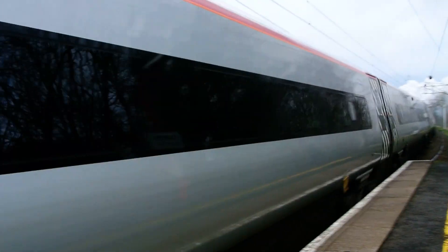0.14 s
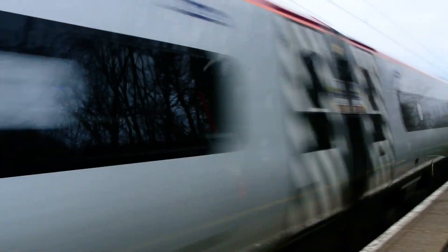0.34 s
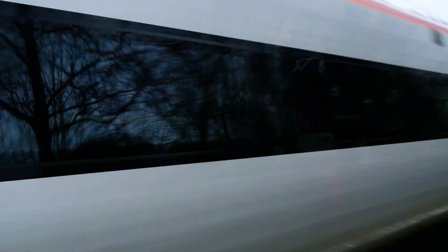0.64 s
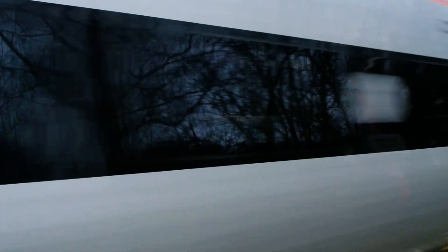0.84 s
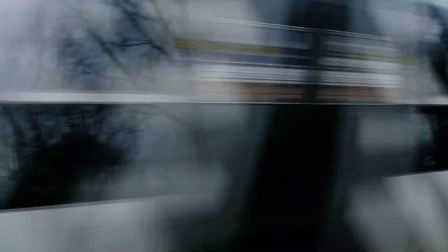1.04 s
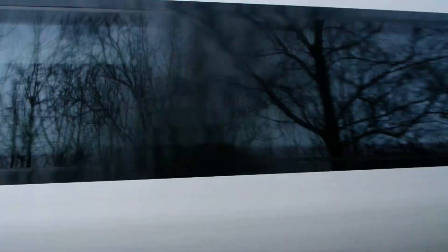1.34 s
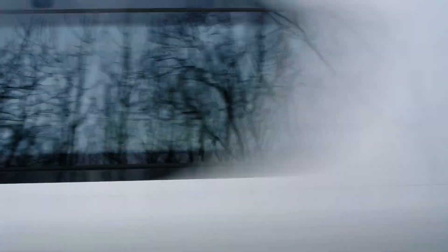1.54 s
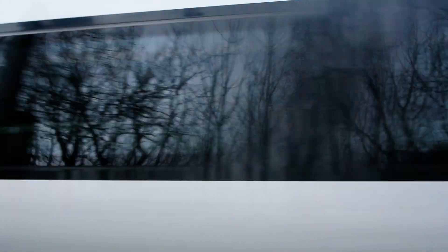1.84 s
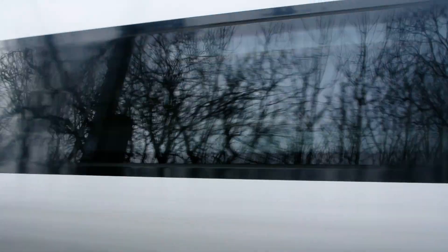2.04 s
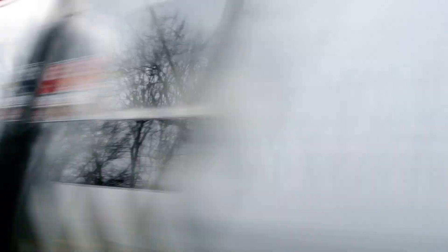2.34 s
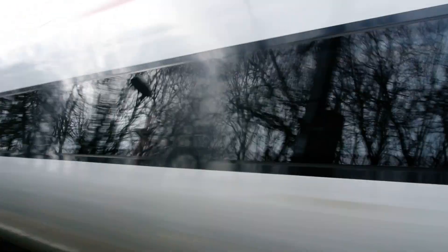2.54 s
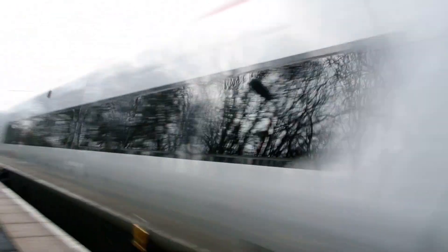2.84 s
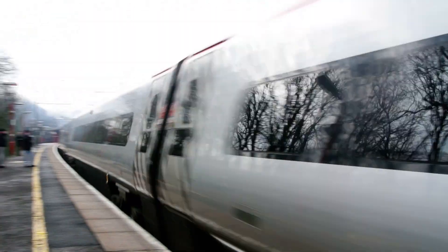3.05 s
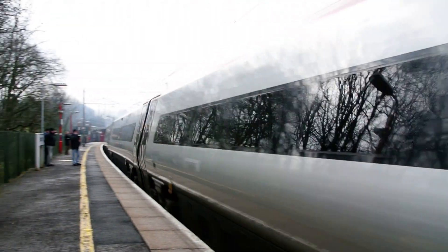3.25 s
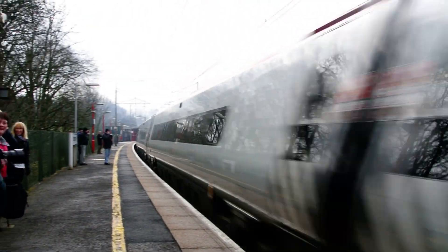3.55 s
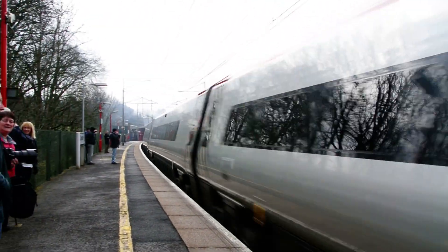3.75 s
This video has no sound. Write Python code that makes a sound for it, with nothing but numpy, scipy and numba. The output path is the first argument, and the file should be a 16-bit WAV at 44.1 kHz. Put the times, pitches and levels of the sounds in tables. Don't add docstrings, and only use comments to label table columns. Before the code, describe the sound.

A fast train rushes past a platform edge a few metres from a small stereo microphone, roaring loudest at first, pulsing with each set of wheels, with short falling squeals, then shrill brake hisses as it gradually eases.

```python
import sys
import numpy as np
from scipy import signal
from scipy.io import wavfile
from scipy.ndimage import uniform_filter1d
from numba import njit

SR = 44100
rng = np.random.default_rng(int(sys.argv[2]) if len(sys.argv) > 2 else 0)


def unload_wav(signal):
    wavfile.write(
        sys.argv[1],
        SR,
        np.round(np.clip(np.atleast_2d(signal).T, -1, 1) * 32767).astype(np.int16),
    )


def natural_amplitude(level_db):
    exponent = np.asarray(level_db, float) / 20
    return 10 ** exponent


N = 171990
T = np.arange(N) / SR

SPEED_M_S, EDGE_M = 40, 3
TURN_S, TURN_LENGTH_S = 1.385, 0.43
PORT_LAG = 6
RISE = 0.82

# time_s, rolling_level_db, bass_tilt_db_per_octave, air_rush_db,
# treble_pan_db (left minus right)
PASSING = [(0, -26, -1.5, -2.5, 5), (.36, -23, 2, -1, 1), (.65, -30, 0.5, 0, 4), (.93, -29, 1.5, 1.5, 0),
           (1.29, -35.5, 0.5, 0, 4), (1.51, -33.5, 0.5, 3.5, -1), (1.64, -29.5, 2, 3, 0),
           (2.0, -35.5, -1, 1.5, 1.5), (2.35, -33.5, 2, 5, -1), (2.61, -35, 2.5, 0.5, 2),
           (2.8, -34.5, 1.5, 2.5, -2), (2.95, -33, 2.5, -4.5, -2.5), (3.19, -37.5, 1, -1, 0.5),
           (3.42, -35, 1, -1, -5.5), (3.58, -34.5, 3.5, -6, -2.5), (3.7, -40.5, 2.5, 2, -1.5),
           (3.9, -41, 0, 0, -3)]


def train_passing():
    return curves(PASSING)


# time_s, boost_db, rise_s
BOGIES = [
    (.37, 1, 0.043),
    (.56, 1, 0.058),
    (.97, 4, 0.079),
    (1.14, 3.5, 0.026),
    (1.62, 3.5, 0.076),
    (2.3, 2.5, 0.2),
    (2.99, 2, 0.071),
    (3.601, 3, 0.099),
]


def bogie_thunder():
    drop_s = 0.021
    boost_db = 0
    for at_s, db, rise_s in BOGIES:
        side_s = np.where(T < at_s, rise_s, drop_s)
        boost_db = boost_db + db * np.exp(-.5 * ((T - at_s) / side_s) ** 2)
    return boost_db


# pitch_hz, density_db (per Hz)
ROLLING = [(15, -45), (30, -4), (269, -6), (1220, -5), (1510, -10), (1930, -1.5), (3590, -10), (4580, -6.5),
           (15900, -11)]
# pitch_hz, width_hz, level_db (relative to the rolling level)
WHEEL_MODES = [(254, 175, -11.5), (615, 155, -13), (1208, 75, -15), (1758, 116, -10.5), (1850, 140, -18.5),
               (2352, 120, -13), (4440, 1270, -3.5), (9270, 160, -18.5)]


def roar():
    roll_db, tilt, rush_db, pan_db = train_passing()
    bogie_db = bogie_thunder()
    behind_share, abeam_share = 0.19, 0.57
    turned = 1 / (1 + np.exp(np.clip(-(T - TURN_S) / (TURN_LENGTH_S / 4), -40, 40)))
    leaving = np.clip(behind_share + (1 - 2 * behind_share) * turned, 0, 1)

    thirds = []
    for hz in 25 * 2 ** (np.arange(29) / 3):
        thirds.append((hz, hz * .2316, shape(ROLLING, hz) + 10 * np.log10(hz)))
    middle_db = 10 * np.log10(sum(10 ** (db / 10) for hz, _, db in thirds if 750 < hz < 3000))
    parts = [(hz, width, db - middle_db, 1) for hz, width, db in thirds]
    parts += [(hz, width, db, 0) for hz, width, db in WHEEL_MODES]

    out, gust = 0, walk(13)
    for hz, width, db, broad in parts:
        treble = np.clip(np.log2(hz / 2500) / 2, 0, 1)
        gain_db = roll_db + db + tilt * min(np.log2(hz / 800), 0) + rush_db * treble - 1.0
        gain_db = gain_db + 0.96 * gust + (1.2 if broad else 2.5) * walk(8.95)
        gain_db = gain_db + bogie_db * broad * (1 - 0.54 * treble)
        gain_db = gain_db - 4.5 * broad * np.exp(-(np.log2(hz / 6650) * 4) ** 2)

        alike = likeness(hz)
        ahead, behind, abeam, own = ports(band(hz - width / 2, hz + width / 2, channels=5))
        common = np.sqrt(1 - leaving) * ahead + np.sqrt(leaving) * behind + abeam_share * abeam
        pair = np.sqrt(alike / (1 + abeam_share ** 2)) * common + np.sqrt(1 - alike) * own
        out = out + natural_amplitude(gain_db) * pair * panned(0.5 + pan_db * (0.31 + 2.1 * treble))
    return out


# loudest_s, length_s, pitch_hz, since_abeam_s, level_db
SQUEALS = [
    (0.073, .05, 8180, .04, -27.5),
    (0.395, 0.038, 9280, .2, -26.5),
    (0.396, .03, 5300, .2, -28),
    (0.449, .25, 4625, 0.35, -29),
    (0.538, .07, 4690, 0.09, -26),
    (0.661, .05, 8240, 0.066, -30),
    (0.949, .05, 4500, 0.085, -18.5),
    (1.007, .04, 4230, 0.12, -25.5),
    (1.67, 0.052, 5380, .07, -27.5),
    (1.793, .04, 4070, 0.16, -30),
]


def squeals():
    pan_db = train_passing()[3]
    out = 0
    for at_s, length_s, hz, since_s, db in SQUEALS:
        out = out + passing_squeal(at_s, length_s, hz / doppler(since_s), since_s, db, 0.93 * pan_db,
                                   width_hz=200, halo_db=-7, rise=RISE)
    return out


def chirp():
    at_s, hz, hz_per_s = 2.804, 10570, -65000
    pan_db = 1.9 * train_passing()[3]
    return burst(at_s, .018, lambda t: hz + hz_per_s * (t - at_s), 150, -28, pan_db, 0.54, RISE)


# loudest_s, length_s, since_abeam_s, attack_share (of the length), level_db
DISCS = [(1.12, .06, .03, 0.49, -33), (1.22, 0.084, 0.038, .7, -30), (1.31, 0.06, 0.19, .7, -37),
         (1.847, .07, .09, 0.49, -30), (2.317, .12, .13, .6, -40), (2.50, .15, .3, .6, -46),
         (2.994, 0.082, 0.066, .05, -16.5), (3.092, 0.073, 0.18, 0.67, -26), (3.28, .2, .4, .6, -35),
         (3.425, 0.042, 0.047, .9, -26), (3.44, 0.043, 0.12, .5, -25), (3.585, 0.059, 0.067, 0.67, -20),
         (3.636, 0.036, 0.087, 0.85, -16.5), (3.717, 0.072, .2, 0.67, -30), (3.86, 0.14, .4, .6, -32)]


def brake_discs():
    _, pan_db = brake_drag()
    out = 0
    for at_s, length_s, since_s, rise, db in DISCS:
        out = out + passing_squeal(at_s, length_s, 16440, since_s, db, pan_db,
                                   width_hz=430, halo_db=0, rise=rise)
    return out


# time_s, hiss_level_db, pan_db (left minus right)
DRAG = [(0, -56, 8), (.46, -48, 10), (.7, -51, 11), (1.13, -33.5, 5), (1.3, -40.5, 14), (1.48, -52, 3),
        (1.64, -33.5, 7), (1.97, -42, 7.5), (2.26, -35, 3), (2.63, -41.5, 9), (2.88, -33, 0), (3.0, -28, 1),
        (3.18, -40, 6), (3.4, -32.5, -3), (3.64, -29.5, 1.5), (3.75, -42, 4), (3.9, -38, 2)]


def brake_drag():
    return curves(DRAG)


# pitch_hz, density_db (per Hz)
HISS = [(9500, -21), (11500, -5.5), (13500, -1), (14500, 2), (15700, 6)]


def brake_hiss():
    hiss_db, pan_db = brake_drag()
    out, flutter = 0, walk(30.62)
    for hz in np.arange(9500, 16500, 800):
        common, left, right = band(hz - 400, hz + 400, channels=3)
        pair = .5 * np.array([common, np.roll(common, PORT_LAG)]) + 1.22 * np.array([left, right])
        gain_db = hiss_db + shape(HISS, hz) - 3.5 + 1.06 * flutter + 0.48 * walk(18)
        out = out + natural_amplitude(gain_db) * pair
    return out * panned(pan_db)


# loudest_s,
# length_s, pitch_hz, level_db
RINGS = [(.1, 0.3, 299, -31), (.3, .12, 336, -41), (.22, 0.077, 2017, -26.5), (0.231, .06, 4000, -32),
         (0.401, 0.13, 1930, -29), (.3, .2, 1240, -34), (.15, .15, 4690, -36), (.4, 0.033, 5980, -29.5),
         (.6, 0.079, 9300, -36), (1, 0.17, 1870, -37), (.92, .06, 1220, -36), (1.13, 0.12, 1700, -40),
         (1.11, 0.11, 1220, -39), (1.547, 0.0806, 1896, -36), (1.666, 0.092, 1760, -35),
         (1.8, 0.13, 2700, -32), (1.75, .2, 1230, -42), (2.27, .06, 1760, -40), (2.3, 0.12, 1230, -40),
         (2.55, .15, 1620, -41.5), (2.5, .05, 3950, -32), (0.11, 0.11, 790, -35.5), (0.27, 0.12, 2600, -30),
         (.8, 0.0608, 685, -38), (2.42, 0.12, 2200, -40), (3.12, 0.087, 1600, -40.5),
         (3.2, 0.037, 2150, -37), (3.3, .12, 14000, -42.5), (3.2, .2, 14720, -36), (3.82, .15, 14700, -37)]


def rings():
    pan_db = .3 * train_passing()[3]
    out = 0
    for at_s, length_s, hz, db in RINGS:
        out = out + burst(at_s, length_s, lambda t: hz + 0 * t, 30 + 0.015 * hz, db, pan_db, 0.63, 0.85)
    return out


# time_s, level_db
WHINE = [(0, -52), (.14, -39), (.62, -52), (.72, -34), (.88, -39.5), (1.14, -44), (1.26, -51),
         (1.38, -37.5), (1.55, -47.5), (1.71, -37), (1.82, -47), (1.95, -39), (2.18, -51), (2.29, -36),
         (2.43, -50), (2.52, -39), (2.8, -52), (3.9, -58)]


def motor_whine():
    level_db, = curves(WHINE)
    return waver(2337, level_db + 0.5, wander_hz=11.8, flutter_db=3.0)


# time_s, level_db, pitch_hz
HUM = [(0, -25.5, 570), (.1, -45, 602.4), (.36, -38.5, 630), (0.539, -33, 602), (.7, -42, 650.1),
       (1.0, -42, 641), (1.15, -40, 591.5), (1.3, -48.5, 621), (1.55, -44, 598), (1.75, -35.5, 578.6),
       (1.9, -45, 600.6), (2.2, -40.5, 598), (2.45, -36, 583), (2.54, -45.5, 580), (2.88, -38, 590.5),
       (3.0, -53, 600), (3.45, -44, 602), (3.9, -58, 600)]


def rail_hum():
    level_db, hz = curves(HUM)
    return waver(hz, level_db - 2, wander_hz=32.2, flutter_db=4.0)


def passing_squeal(at_s, length_s, hz, since_s, db, pan_db, width_hz, halo_db, rise):
    path = lambda t: hz * doppler(t - at_s + since_s)
    core = burst(at_s, length_s, path, width_hz, db, pan_db, 0.28, rise)
    halo = burst(at_s, 1.2 * length_s, path, 4.5 * width_hz, db + halo_db, pan_db, 0.2, min(rise + .3, RISE))
    return core + halo


def doppler(since_s):
    along_m = SPEED_M_S * since_s
    return 1 / (1 + SPEED_M_S / 343 * along_m / np.hypot(along_m, EDGE_M))


def burst(at_s, length_s, hz, width_hz, db, pan_db, alike, rise):
    span = slice(max(int((at_s - length_s) * SR), 0), min(int((at_s + 2 * length_s) * SR), N))
    t = T[span]
    path = np.clip(hz(t), 50, 19000)
    width = float(width_hz)
    noises = rng.standard_normal((3, len(t)))
    x = np.array([level(svf(svf(noise, path, width), path, width), db) for noise in noises])
    lag = PORT_LAG if at_s < TURN_S else -PORT_LAG
    shared = np.array([x[0], np.roll(x[0], lag)])
    pair = np.sqrt(alike) * shared + np.sqrt(1 - alike) * x[1:]
    side = np.where(t < at_s, max(rise, .03), .9)
    swell = np.exp(-2 * ((t - at_s) / length_s / side) ** 2)
    out = np.zeros((2, N))
    out[:, span] = pair * swell * panned(pan_db[span])
    return out


def waver(hz, db, wander_hz, flutter_db):
    phase = 2 * np.pi * np.cumsum(hz + wander_hz * walk(60)) / SR
    pair = [natural_amplitude(db + flutter_db * walk(34.99)) * np.sin(phase + 0.52 * walk(12)) for _ in range(2)]
    return np.sqrt(2) * np.array(pair)


def likeness(hz):
    low, high = 0.83, 0.049
    alike = np.clip(high + (low - high) / (1 + (hz / 2700) ** 2), 0, 1)
    return alike / (1 + 0.31 * (hz < 90))


def ports(x):
    ahead = [x[0], np.roll(x[0], PORT_LAG)]
    behind = [np.roll(x[1], PORT_LAG), x[1]]
    abeam, own = [x[4], x[4]], [x[2], x[3]]
    return np.array([ahead, behind, abeam, own])


def panned(pan_db):
    return natural_amplitude(np.array([pan_db, -pan_db]) / 2)


def band(lo_hz, hi_hz, channels):
    edges = np.minimum([lo_hz, hi_hz], [20000, 21000])
    sos = signal.butter(2, edges, "band", fs=SR, output="sos")
    x = signal.sosfilt(sos, rng.standard_normal((channels, N)))
    return x / x.std()


@njit
def svf(x, hz, width):
    y, b, l = np.empty(len(x)), 0., 0.
    for i in range(len(x)):
        g, k = np.tan(np.pi * hz[i] / SR), width / hz[i]
        v = (b + g * (x[i] - l)) / (1 + g * (g + k))
        b, l, y[i] = 2 * v - b, l + 2 * g * v, k * v
    return y


def walk(rate):
    k = int(SR / rate)
    steps = np.repeat(rng.standard_normal(N // k + 1), k)
    return 1.3 * uniform_filter1d(uniform_filter1d(steps, k), k)[:N]


def level(x, db):
    return x * natural_amplitude(db) / np.sqrt(np.mean(x ** 2))


def shape(table, hz):
    table_hz, db = np.array(table).T
    return np.interp(np.log(hz), np.log(table_hz), db)


def curves(table):
    columns = np.array(table).T
    return [np.interp(T, columns[0], column) for column in columns[1:]]


def scene():
    return (roar() + squeals() + chirp() + brake_discs() + brake_hiss()
            + rings() + motor_whine() + rail_hum())


def band_limit(x):
    return signal.sosfilt(signal.butter(12, 16020, fs=SR, output="sos"), x)


def record(dry):
    low_cut = signal.butter(2, 48, "high", fs=SR, output="sos")
    top_cut = signal.ellip(12, .3, 60, 15750, fs=SR, output="sos")
    mix = signal.sosfilt(top_cut, signal.sosfilt(low_cut, dry))
    return band_limit(mix)


dry = scene()
out = record(dry)
unload_wav(out)
```